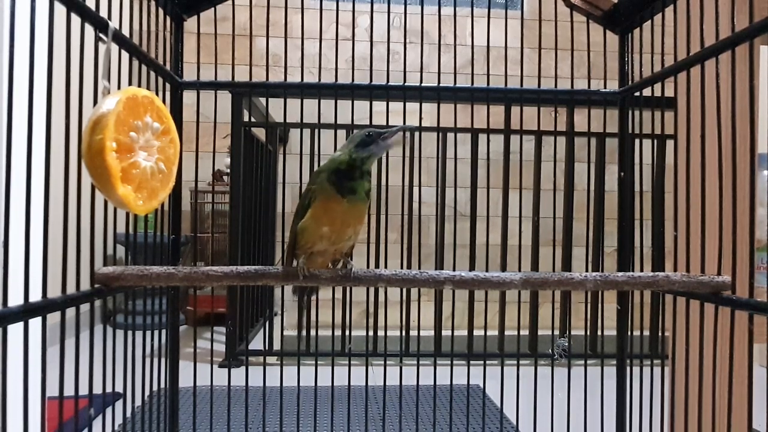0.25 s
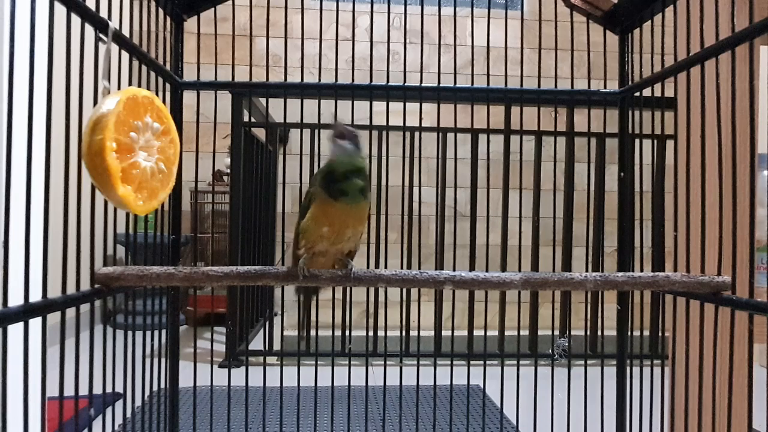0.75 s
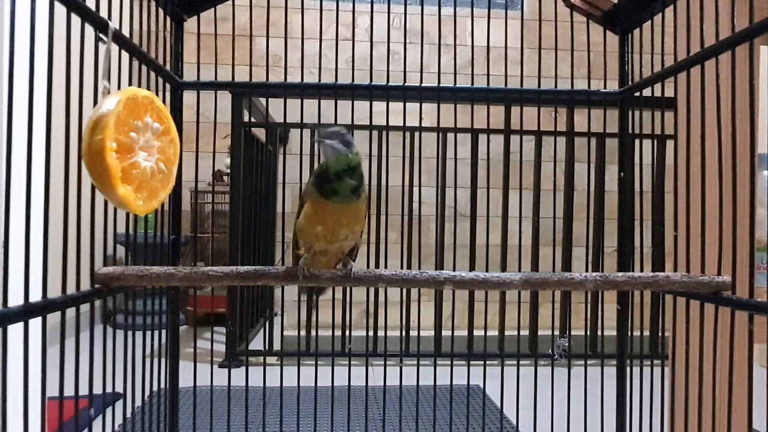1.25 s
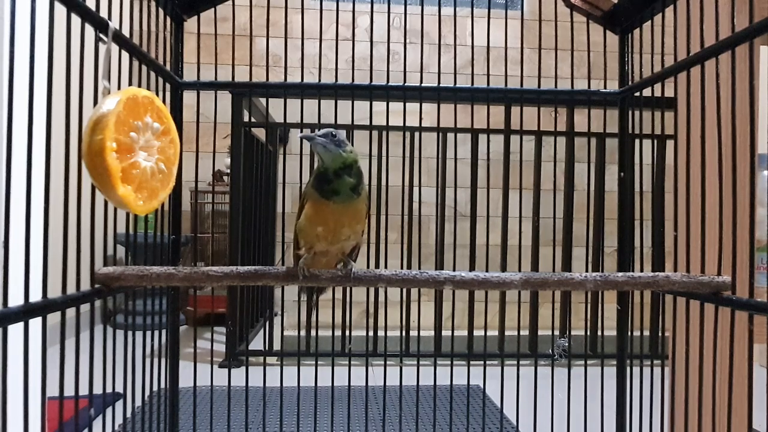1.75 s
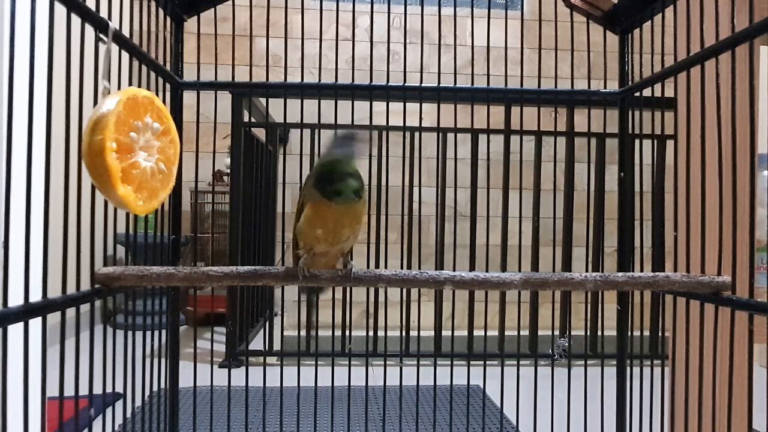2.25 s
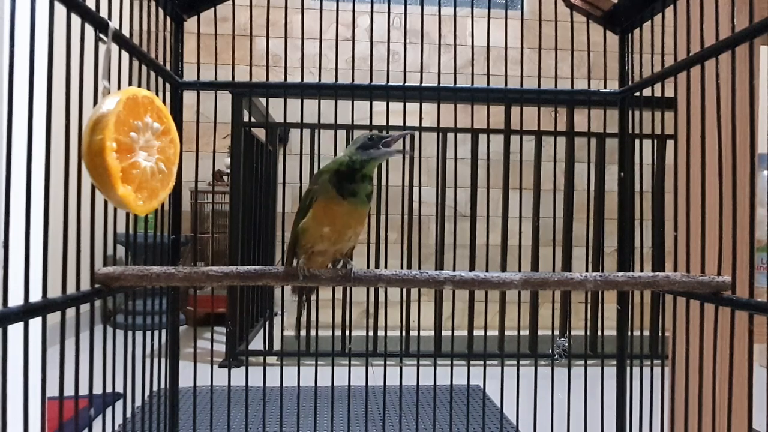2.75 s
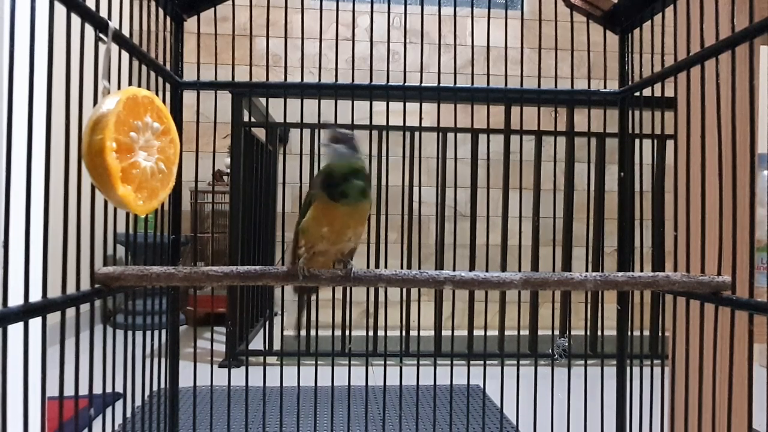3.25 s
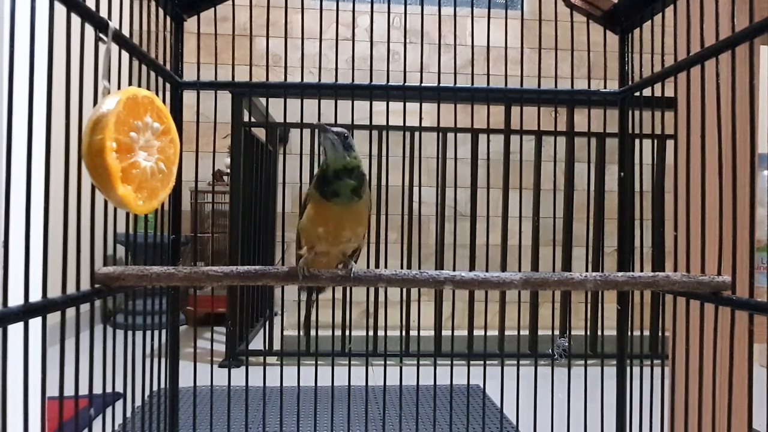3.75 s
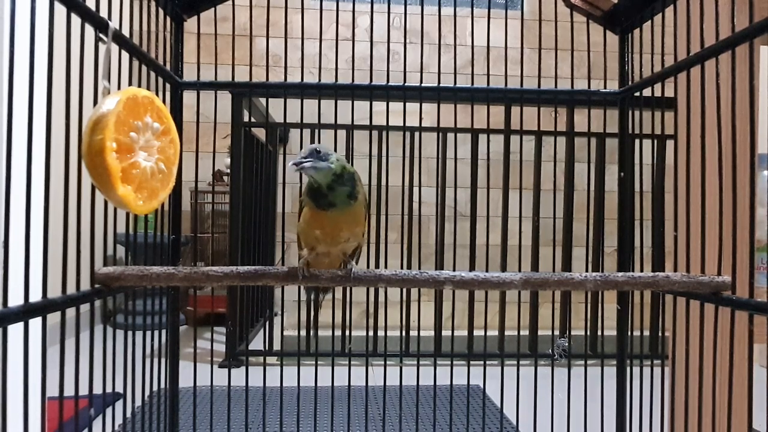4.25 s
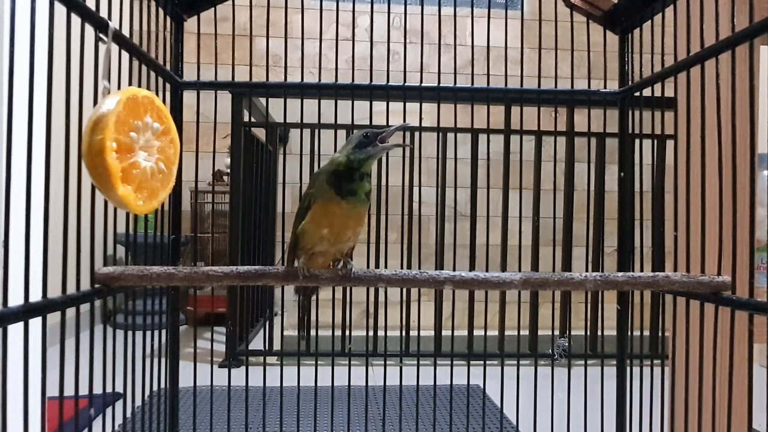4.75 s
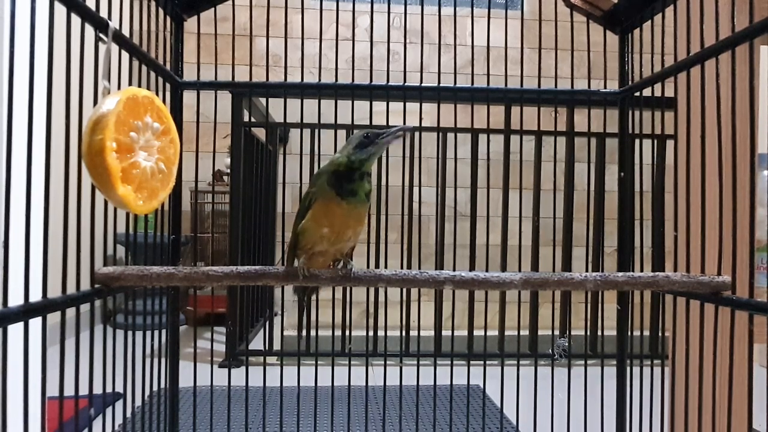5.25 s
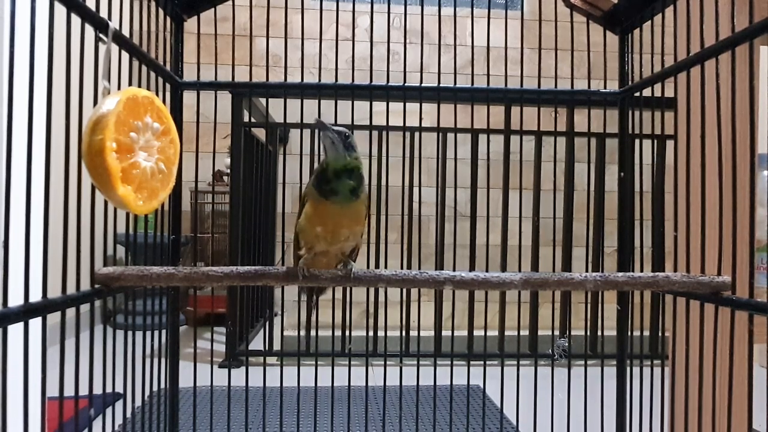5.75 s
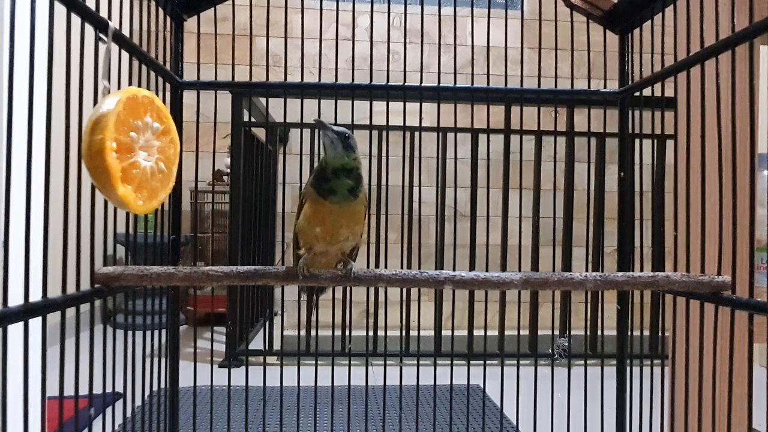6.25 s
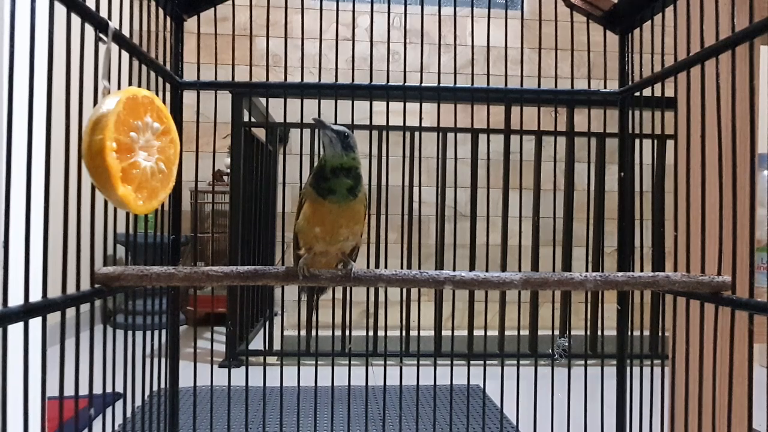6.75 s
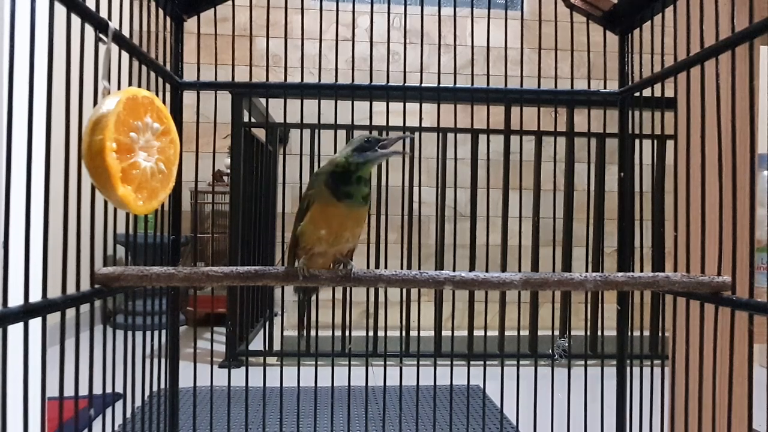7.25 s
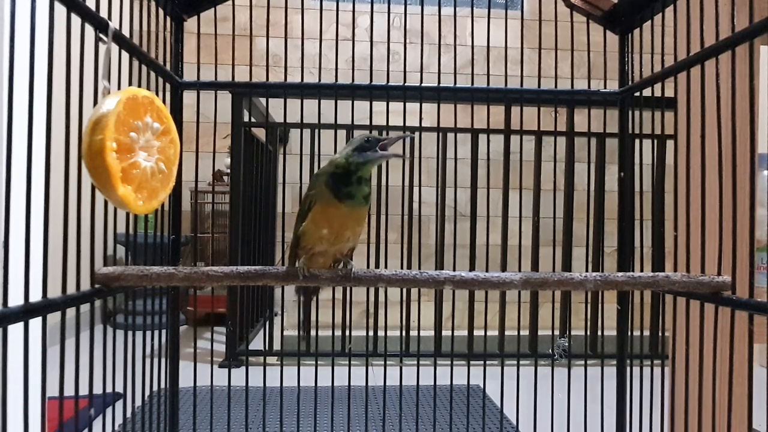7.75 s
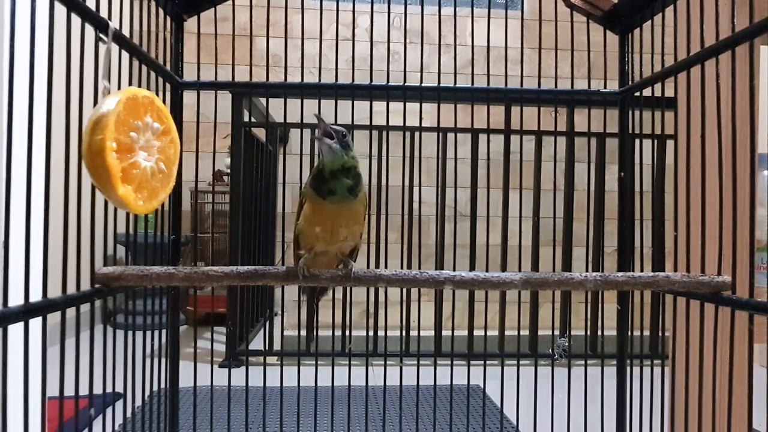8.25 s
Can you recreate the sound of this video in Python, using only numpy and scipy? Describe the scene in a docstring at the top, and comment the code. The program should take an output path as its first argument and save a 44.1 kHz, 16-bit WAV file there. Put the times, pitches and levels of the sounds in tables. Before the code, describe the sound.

Close, piercing bird song in bursts of rapid chatter and buzzy whistles, with a far bird trilling in the pauses over soft town hush.

```python
"""A caged songbird sings close to a phone in a hard-walled porch: bouts of fast rising chatter and harsh whistles.
Both sides of its syrinx sound at once, so sums and differences of two pitches fill each note.
Wall echoes and a dense porch tail follow it; soft low thuds go with the last chatter notes.
A far bird trills rising pips in the pauses, over a wavering traffic drone and the coloured noise of town air."""
import sys
import numpy as np
from scipy import signal
from scipy.fft import rfft, irfft, next_fast_len
from scipy.io import wavfile
from scipy.ndimage import uniform_filter1d, map_coordinates

SR = 44100
rng = np.random.default_rng(int(sys.argv[2]) if len(sys.argv) > 2 else 0)


def attenuation_scalar(level_db):
    """Turn a level in dB into a linear amplitude multiplier (20 dB per decade)."""
    decades = np.asarray(level_db, float) / 20
    return 10 ** decades


def waveform_to_disk(signal):
    """Save audio, clipped to [-1, 1], as 16-bit WAV at the path in sys.argv[1]."""
    frames = np.transpose(np.atleast_2d(signal))
    scaled = np.clip(frames, -1, 1) * 32767
    samples = np.round(scaled).astype(np.int16)
    wavfile.write(sys.argv[1], SR, samples)


N = 373968
T = np.arange(N) / SR
PORTS = np.array([[1], [-1]]) / 2  # shares a left-minus-right difference between the two microphone ports

# short chatter notes: (start t/s, rise t/s, length t/s, top of high voice f/Hz, level/dB)
CHATTER_NOTES = [(0.342, 0.02, 0.032, 2730, -18.5), (0.396, 0.015, 0.03, 2503, -18),
                 (0.453, 0.022, 0.029, 2550, -17), (0.512, 0.019, 0.031, 2550, -17.5),
                 (2.322, 0.022, 0.027, 3685, -13), (2.372, 0.025, 0.032, 3000, -14),
                 (2.433, 0.02, 0.027, 2867, -13.5), (2.499, 0.022, 0.026, 3026, -12),
                 (3.996, 0.03, 0.023, 3000, -15.5), (4.048, 0.017, 0.026, 2370, -16.5),
                 (4.103, 0.011, 0.023, 2434, -17.5), (4.169, 0.021, 0.024, 2725, -16.5),
                 (7.072, 0.022, 0.028, 4580, -11), (7.132, 0.022, 0.031, 3086, -14),
                 (7.202, 0.022, 0.03, 3684, -13.5), (7.269, 0.021, 0.036, 2683, -17),
                 (7.356, 0.023, 0.025, 3865, -14), (7.437, 0.022, 0.026, 4600, -13),
                 (7.504, 0.025, 0.032, 5225, -15), (7.588, 0.022, 0.028, 5240, -14.5),
                 (7.662, 0.018, 0.027, 5210, -15), (7.733, 0.027, 0.034, 5575, -14.5),
                 (7.81, 0.024, 0.031, 5090, -15), (7.904, 0.017, 0.026, 5260, -15.5),
                 (7.976, 0.024, 0.031, 5190, -14), (8.059, 0.019, 0.024, 5165, -13.5),
                 (8.137, 0.016, 0.024, 4945, -13), (8.219, 0.024, 0.024, 5185, -11.5),
                 (8.305, 0.025, 0.029, 5180, -14), (8.385, 0.019, 0.026, 5360, -13.5),
                 (8.469, 0.018, 0.033, 5140, -13.5)]
CHATTER_START_HZ = (1202, 1780)  # where the (low, high) voice leaps from in chatter and straight after it


def curve(points, hz):
    """Read (f/Hz, value) points on a log-frequency axis."""
    f, v = np.transpose(points)
    return np.interp(np.log(np.maximum(hz, 1)), np.log(f), v)


def shape(x, gain):
    """Filter by a function of frequency."""
    size = next_fast_len(x.shape[-1] + 4096)
    spectrum = rfft(x, size) * gain(np.fft.rfftfreq(size, 1 / SR))
    return irfft(spectrum, size)[..., :x.shape[-1]]


def walk(rate, size=N):
    """Smooth chance of spread 1 that changes about rate times a second."""
    k = max(int(SR / rate), 2)
    x = uniform_filter1d(uniform_filter1d(rng.standard_normal(size), k), k)
    return x * np.sqrt(1.5 * k)  # restores the spread lost in smoothing


def syrinx(low, high, jitter, flutter_db, even, breath_db, lead_db, slope_db):
    """Two shaky membranes share one windpipe: every tone passes the throat at its own pitch, breath hisses along."""
    # tones of the coupled voices at the syrinx: (multiple of low, multiple of high, relative level/dB before evening)
    tone_mix = [(-1, 1, -17.5), (1, 0, -3.5), (0, 1, -3), (-1, 2, -6.5), (2, 0, 0.5), (1, 1, 4.5),
                (0, 2, -10.5), (3, 0, -1), (2, 1, -2.5), (1, 2, -10.5), (4, 0, 0.5), (0, 3, -19),
                (3, 1, 0.5), (2, 2, -1), (1, 3, -25), (5, 0, -20), (4, 1, -0.5), (3, 2, -6), (2, 3, -30),
                (6, 0, -32), (5, 1, 1.5), (4, 2, -12), (3, 3, -13), (6, 1, -23), (5, 2, -44), (4, 3, -5)]
    # windpipe and open beak: (f/Hz, relative level/dB)
    throat = [(300, -42), (650, -20), (880, -15), (1150, -22), (1400, -10.5), (1700, -13), (2200, -16.5),
              (2480, -7.5), (2800, -16), (3200, -7.5), (3800, -5), (5000, -6), (5900, -2), (7200, -7.5),
              (8300, -21.5), (9600, -11), (11700, -16.5), (14200, -14), (16500, -33)]
    size = len(low)
    low, high = (f * (1 + jitter * walk(764, size=size)) for f in (low, high))
    m, n, db = np.transpose(tone_mix)[:, :, None]
    m, n = np.rint(m), np.rint(n)
    hz = m * low + n * high
    order = abs(m) + abs(n)
    source_db = (1 - even) * db + lead_db * (n - m) / order - slope_db * order
    gain = attenuation_scalar(source_db + curve(throat, hz)) * (hz < 16500)
    gain = gain / np.sqrt(np.sum(gain ** 2, axis=0))
    # higher combinations are less steady in size and pitch
    shake = np.array([[walk(157, size=size), walk(930, size=size)] for _ in tone_mix])
    flutter = attenuation_scalar(flutter_db * np.minimum(order + 1.0, 4) * np.clip(shake[:, 0], -2, 2))
    hz = hz + 3 * order ** 2 * shake[:, 1]
    phase = np.cumsum(hz, axis=1) / SR + rng.random((len(tone_mix), 1))
    tones = np.sum(gain * flutter * np.cos(2 * np.pi * phase), axis=0)
    breath = shape(rng.standard_normal(size), lambda f: attenuation_scalar(curve(throat, f)) / (1 + (3000 / (f + 1)) ** 2))
    return tones + attenuation_scalar(breath_db) * breath / breath.std()


def whistles():
    """Long notes: both voices leap up, arch and sag; straight after chatter they leap from lower down."""
    # (start t/s, length t/s, top of low voice f/Hz, top of high voice f/Hz, level/dB, tilt start to end level/dB)
    whistle_notes = [(-0.045, .19, 2282, 3232, -22.5, -25), (0.574, 0.13, 2226, 3087, -18, -4),
                     (0.782, 0.13, 2332, 3166, -16.5, -6.5), (0.975, .15, 2432, 3270, -16.5, -3),
                     (1.187, 0.15, 2560, 3793, -19, 1), (2.559, 0.12, 2220, 3123, -15.5, -7),
                     (2.804, 0.13, 2365, 3180, -16, -5), (3.004, 0.14, 2525, 3444, -17, -0.5),
                     (3.247, 0.15, 2517, 3543, -17, -0.5), (3.484, 0.14, 2452, 3416, -18.5, 4),
                     (4.231, 0.055, 2114, 2925, -18.5, -1), (4.379, 0.11, 2262, 3183, -17.5, -1),
                     (4.572, 0.13, 2377, 3215, -16, -5), (4.773, 0.14, 2468, 3378, -16.5, -1.5),
                     (5.157, 0.14, 2519, 3433, -17, -1), (5.4, 0.14, 2505, 3380, -17, 2.5),
                     (5.639, 0.12, 2448, 3327, -16.5, -0.5)]
    slack_hz, tired_hz = (1703, 2400), (2200, 3060)  # (low, high) where a fresh whistle starts, and sags towards
    # from silence, or straight after chatter: (leap s, share of the top on landing, place of the top 0-1)
    fresh, after_chatter = (.02, 0.94, .33), (.03, .92, .55)
    sag_power, least_sag = 1.8, 0.0648  # bend of the sag; every note loses at least this share of its top
    waver, wavers_per_s = 0.0051, 35.4  # unsteadiness of each voice, share of its pitch
    release_s = 0.011
    swell_db_per_hz, flat_hz, swell_at = 0.0516, 2560, 0.48  # lower whistles swell in the middle, high ones do not
    out = np.zeros(N + SR)  # one spare second ahead, as the first whistle has already begun
    chatter_s = np.transpose(CHATTER_NOTES)[0]
    for s, length, low_top, high_top, db, tilt_db in whistle_notes:
        t = np.arange(int(length * SR)) / SR
        u = t / length
        joined = np.any((chatter_s < s) & (chatter_s > s - .1))
        leap_s, lands, top_at = after_chatter if joined else fresh
        starts = CHATTER_START_HZ if joined else slack_hz
        leap = np.clip(t / leap_s, 0, 1)
        climb = lands + (1 - lands) * np.sin(np.pi / 2 * np.clip(u / top_at, 0, 1))
        sag = np.clip((u - top_at) / (1 - top_at), 0, 1) ** sag_power
        voices = []
        for start_hz, top, tired in zip(starts, (low_top, high_top), tired_hz):
            end_hz = min(tired, (1 - least_sag) * top)
            arch = top * climb + (end_hz - top) * sag
            hz = start_hz + (arch - start_hz) * leap ** .5
            voices.append(hz * (1 + waver * walk(wavers_per_s, size=len(t))))
        low, high = voices
        lead_db = -0.3 + 1.5 * walk(20, size=len(t))  # the balance of the two voices sways
        swell_db = 0 if joined else swell_db_per_hz * max(flat_hz - low_top, 0)
        bulge = np.interp(u, [.15, swell_at, 1], [-.6, .4, -.6])
        fade = np.clip((t - length) / release_s + 1, 0, 1)
        level_db = db - 11.5 * (1 - leap) ** 1.35 + swell_db * bulge
        level_db = level_db + tilt_db * (u - .5) + 0.5 * sag ** 3 - 2 * fade
        edges = signal.windows.tukey(len(t), .06)
        breath_db = -16 + 11 * (1 - leap)  # breathiest during the leap
        voice = syrinx(low, high, .006, 0.74, 0.18, breath_db, lead_db, slope_db=1.5)
        start = SR + int(s * SR)
        out[start:start + len(t)] += edges * attenuation_scalar(level_db) * voice
    return out[SR:]


def turn_head(bird):
    """The bird turns its head: treble, balance and timing at the two ports drift along."""
    # (t/s, left minus right level/dB, left lag/samples, treble level/dB)
    head = [(0, 4.5, 0.8, -8.5), (.45, -3, 3, 1), (.65, 0, 2.5, 1.5), (.85, -1, 0.2, 3), (1.3, 2, 0.2, 2),
            (2.4, -0.5, 1.1, 0), (2.9, -1.5, 2.5, 3), (3.1, -4, 2.3, 2), (3.55, 0.5, -.4, 3.5),
            (4.1, -1.5, -1.2, 3), (4.45, -2, -0.5, 0.5), (4.7, 0, 2.7, 3.5), (4.85, -2.5, 1.5, 3.5),
            (5.2, -1.5, 2.6, 1), (5.5, 1, -.6, 3.5), (7.1, -1.5, 1, 0.5), (7.7, -3, 2.45, 2),
            (8.2, -2, -0.47, 0.8)]
    # fixed difference of the ports: (f/Hz, left minus right level/dB)
    port_db = [(300, -2), (1300, 2), (2400, 0), (3500, -1.5), (5500, -9.5), (7500, -9), (9500, -1.5),
               (12000, -7.5), (15000, -20)]
    # (f/Hz, left phase lead/rad)
    port_lead = [(1500, .05), (3000, 1.57), (3800, 1.76), (5000, 2.68), (6300, 3.32), (8500, 6.2),
                 (16000, 6.07)]
    s, *columns = np.transpose(head)
    pan_db, lag, treble_db = (np.interp(T, s, c) for c in columns)
    treble = shape(bird, lambda f: 1 / (1 + (8200 / (f + 1)) ** 12))
    bird = bird + (attenuation_scalar(treble_db) - 1) * treble
    near = shape(bird, lambda f: attenuation_scalar(PORTS * curve(port_db, f)) * np.exp(1j * PORTS * curve(port_lead, f)))
    near[0] = map_coordinates(near[0], [np.arange(N) - lag], order=3)
    return bird, near * attenuation_scalar(PORTS * pan_db)


def wall_echoes(x):
    """The nearest walls each return one delayed copy, at its own level in each port."""
    # (delay t/s, left level/dB, right level/dB)
    walls = [(.0135, -27, -14.5), (.007, -7.5, -63), (.024, -37, -17)]
    return sum(attenuation_scalar(np.array([[left_db], [right_db]])) * np.pad(x, (int(delay * SR), 0))[:N]
               for delay, left_db, right_db in walls)


def porch(x, delay, early_db):
    """Tiles and walls answer with dense echoes, unlike at the two ports; a quick cluster comes first."""
    # (f/Hz, time to fall by 60 dB t/s)
    decay = [(500, .5), (1500, 1), (2600, 0.99), (5500, 0.86), (8000, 0.53), (12000, 0.49), (16000, 0.96)]
    t = np.arange(int(.9 * SR)) / SR
    tail = 0
    for hz in 400 * 2 ** np.arange(0, 5.6, .5):  # overlapping bands half an octave apart
        band = shape(rng.standard_normal((2, len(t))),
                     lambda f: np.cos(np.pi * np.clip(np.log2(f / hz + 1e-9), -.5, .5)))
        tail = tail + band * attenuation_scalar(-60 * t / curve(decay, hz))
    cluster = 1 + attenuation_scalar(early_db) * np.exp(-t / 0.059)
    tail = tail * cluster * np.clip(t / delay - 1, 0, 1)
    tail = tail / np.sqrt(np.sum(tail ** 2) / 2)
    return signal.fftconvolve(x[None], tail, axes=1)[:, :N]


def traffic():
    """A wavering far engine drone, nearly alike at both ports: one gliding pitch that quick random swings roughen."""
    # (t/s, drone f/Hz, level/dB before a slight lean to the right)
    drone_path = [(0, 66, -59), (.4, 70, -63), (1.55, 70.5, -58), (1.75, 71, -62), (2.05, 72, -57.5),
                  (2.5, 79, -65), (2.9, 96, -55.5), (3.38, 92, -46), (3.83, 86, -51.5), (4.2, 94, -58),
                  (4.63, 87, -60), (5.0, 87, -56.5), (5.45, 90, -62), (6.15, 80, -55.5), (7.0, 74, -47),
                  (7.15, 79, -57), (7.5, 87, -46.5), (8.48, 80, -54.5)]
    s, hz, db = np.transpose(drone_path)
    turn = np.exp(2j * np.pi * np.cumsum(np.interp(T, s, hz)) / SR)
    # the swings widen the pitch into a narrow throbbing band
    mid, side = (np.real((0.24 + walk(58) + 1j * walk(55)) * turn) for _ in range(2))
    drone = mid / mid.std() + 0.23 * side / side.std() * np.array([[1], [-1]])
    return drone * attenuation_scalar(np.interp(T, s, db) + np.array([[-.9], [.9]]))


def hush(gain):
    """Noise of a given colour, most alike left and right low down; rms 1."""
    # (f/Hz, likeness of left and right; below 0 counts as 0)
    likeness = [(60, 0.89), (130, 0.93), (290, 0.86), (640, 0.71), (1410, -0.12), (3100, -0.37),
                (6820, 0.08), (15000, -0.67)]
    alike = lambda f: np.clip(curve(likeness, f), 0, 1)
    mid = shape(rng.standard_normal(N), lambda f: gain(f) * np.sqrt(1 + alike(f)))
    side = shape(rng.standard_normal(N), lambda f: gain(f) * np.sqrt(1 - alike(f)))
    both = mid + side * np.array([[1], [-1]])
    return both / both.std()


def air():
    """Broad town hush over a steady deep rumble, with a hum and a middle band that wander in level."""
    # (f/Hz, relative level/dB per Hz)
    colour = [(20, -46), (45, -32), (80, -13), (150, -0.5), (270, -8), (600, -14), (800, -8), (1760, -9.5),
              (3700, -10), (5000, -12), (8000, -21.5), (11000, -22), (16000, -26)]
    surge_db = 9.5 * np.exp(-((T - 6.23) / 0.17) ** 2)  # hum and middle band swell once together
    broad = hush(lambda f: attenuation_scalar(curve(colour, f))) * attenuation_scalar(-53.5 + 1.7 * walk(4.5))
    deep = hush(lambda f: 1 / (1 + ((f - 38) / 10) ** 4)) * attenuation_scalar(-81)
    hum = hush(lambda f: 1 / (1 + ((f - 145) / 14) ** 2)) * attenuation_scalar(-65.5 + surge_db + 1.7 * walk(3.5))
    middle_db = -64.5 + surge_db + 1.16 * walk(1.3) + 0.26 * walk(21)
    middle = hush(lambda f: 1 / (1 + ((f - 570) / 110) ** 2)) * attenuation_scalar(middle_db)
    return broad + deep + hum + middle


def far_bird():
    """Quick rising pips, about ten a second: gated gliding sines that weaken towards the end of a trill."""
    # (start t/s, end t/s, notes a second, start f/Hz, end f/Hz, wobble f/Hz, level/dB ahead of the distance)
    trills = [(0.14, .36, 8.4, 3980, 4000, 30, -48), (1.514, 2.35, 10, 3916, 4106, 25.5, -46.5),
              (5.876, 7.101, 10.1, 3385, 4607, 190, -44)]
    out = np.zeros(N)
    for start, end, rate, from_hz, to_hz, wobble_hz, db in trills:
        turn = np.minimum((T - start) * rate % 1 / .75, 1)  # the last quarter of each pip is a gap
        hz = from_hz + (to_hz - from_hz) * turn + wobble_hz * walk(242.4)
        gate = np.abs(np.sin(np.pi * turn)) ** .5 * (T > start) * (T < end)
        progress = np.clip((T - start) / (end - start), 0, 1)
        level_db = db + 1.5 * walk(4.5) - 4 * progress ** 3
        out += attenuation_scalar(level_db) * gate * np.sin(2 * np.pi * np.cumsum(hz) / SR)
    return out


def chatter():
    """Short notes: tension whips both voices up, later and steeper the higher they go, then lets them drop."""
    # the low voice trails the high one: (top of high voice f/Hz, top of low voice f/Hz)
    low_follows = [(2350, 1690), (3700, 2450), (4600, 2500), (5100, 2710)]
    lead_in_s = .015
    low_start, high_start = CHATTER_START_HZ
    out = np.zeros(N + SR)
    for s, rise, length, high_top, db in CHATTER_NOTES:
        low_top = curve(low_follows, high_top)
        t = np.arange(int((length + .018) * SR)) / SR - lead_in_s
        u = np.maximum(t / rise, 0)
        climb = u ** (.9 + (high_top - 2900) / 2400)
        drop = np.maximum(1 - 2.4 * (u - 1), 0)
        pull = np.where(u < 1, climb, drop)
        pull = pull + 32 * np.minimum(t, 0)  # slacker still in the faint lead-in
        low = low_start + (low_top - low_start) * pull
        high = high_start + (high_top - high_start) * pull
        breath_db = -4 - 9 * pull  # slack membranes rasp, taut ones ring clean
        # the wider the leap, the more the high voice takes over and the purer the top
        leap = max(high_top / low_top - 1.5, 0)
        jitter, lead_db, slope_db = .018 + .04 * leap, 9 * leap, leap * (8 * pull - 3)
        voice = syrinx(low, high, jitter, 1.0, 0.1, breath_db, lead_db, slope_db)
        swell_db = np.interp(t, [-lead_in_s, -.004, .004, 0.99 * rise, length - .004, length + 0.005],
                             [-40, -22, -7 - 8 * leap, -.5, -1.5 - 6 * leap, -22])
        start = int((s - lead_in_s) * SR)
        out[start:start + len(t)] += attenuation_scalar(db + swell_db) * voice
    return out[:N]


def thuds():
    """The last chatter notes each push a soft low thud at their top: a short puff of air pressure."""
    puffs = sum(np.exp(-((T - s - rise) / 0.0011) ** 2) for s, rise, *_ in CHATTER_NOTES if s > 7.86)
    return shape(attenuation_scalar(-37) * puffs, lambda f: f ** 2 / (f ** 2 + 90 ** 2))


def scene():
    """Near bird direct, off the walls and through the porch; far bird mostly through the porch; town behind."""
    bird, near = turn_head(whistles() + chatter())
    thin = shape(bird, lambda f: 1 / (1 + (1500 / (f + 1)) ** 2))  # low tones reach the walls weakly
    echoes = wall_echoes(thin)
    far = far_bird()
    wet = porch(thin * attenuation_scalar(-6.5) + far, delay=0.0017, early_db=0.0) * attenuation_scalar(PORTS * -3.)
    far_direct = attenuation_scalar(-10 - 4 * PORTS) * far
    return near + echoes + wet + far_direct + thuds() + traffic() + air()


def roll_off(x):
    """The treble ends steeply here."""
    return signal.sosfilt(signal.butter(12, 16260, fs=SR, output="sos"), x)


def record(dry):
    """The phone rounds the loudest peaks."""
    mix = 0.92 * np.tanh(dry / 0.87)
    return roll_off(mix)


dry = scene()
out = record(dry)
waveform_to_disk(out)
```